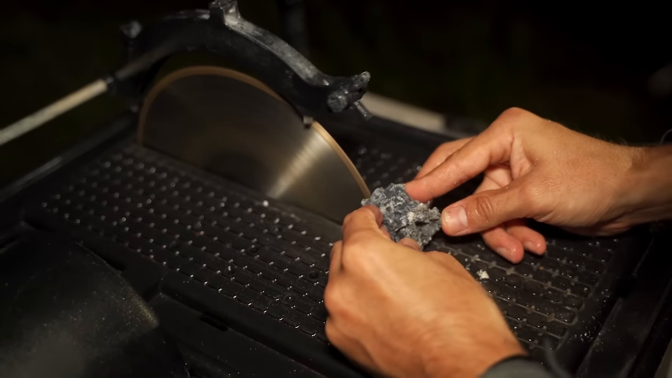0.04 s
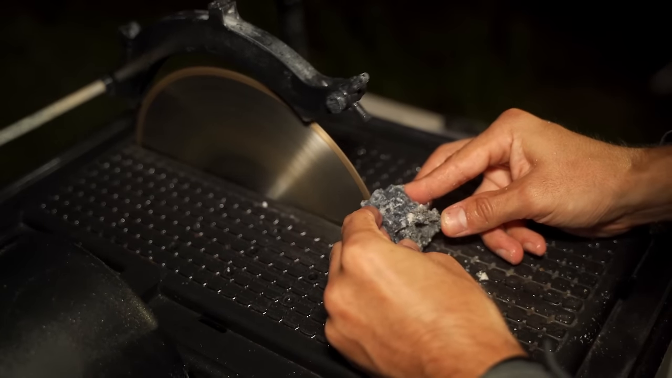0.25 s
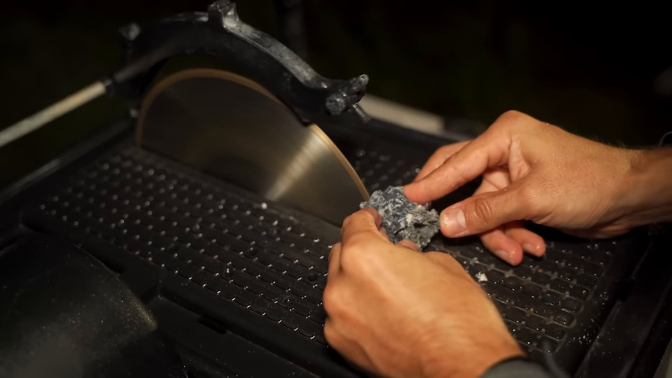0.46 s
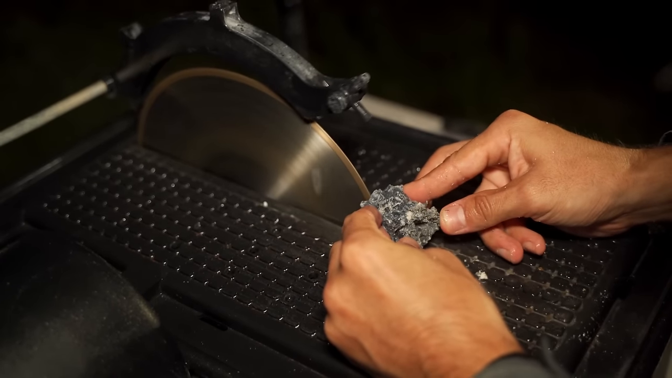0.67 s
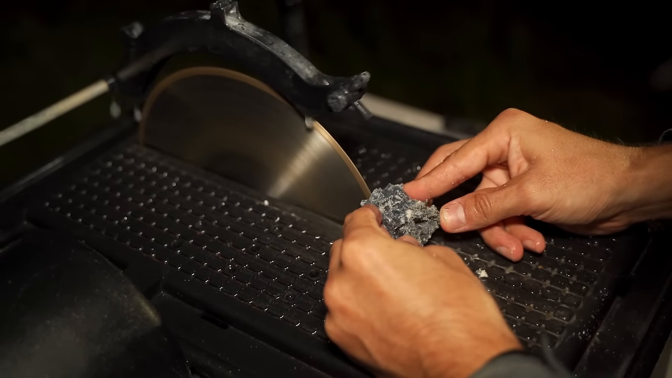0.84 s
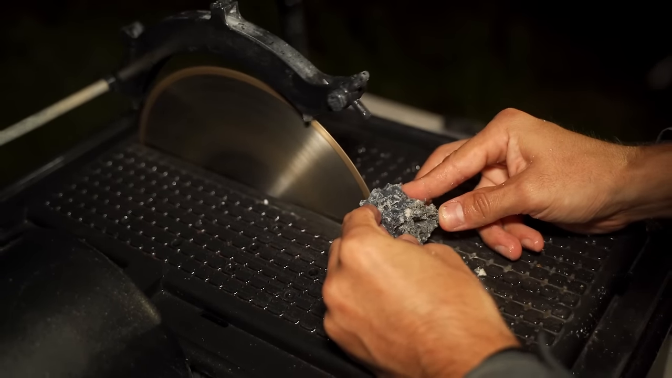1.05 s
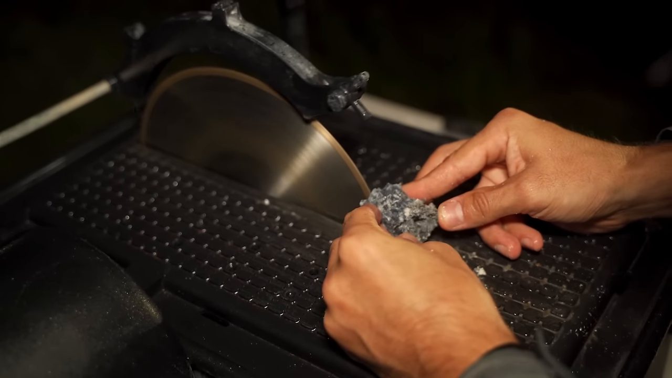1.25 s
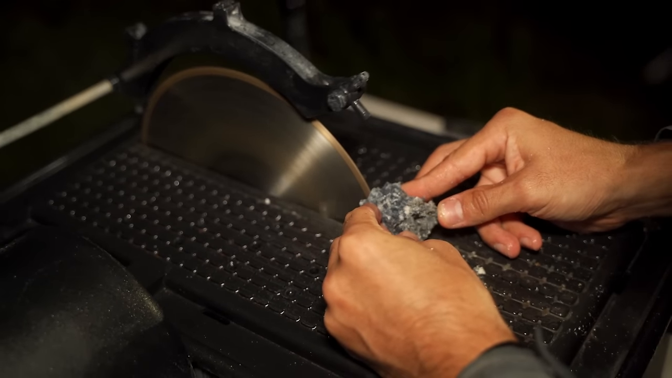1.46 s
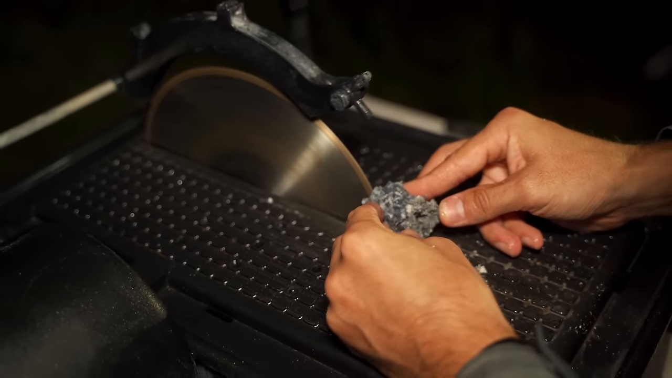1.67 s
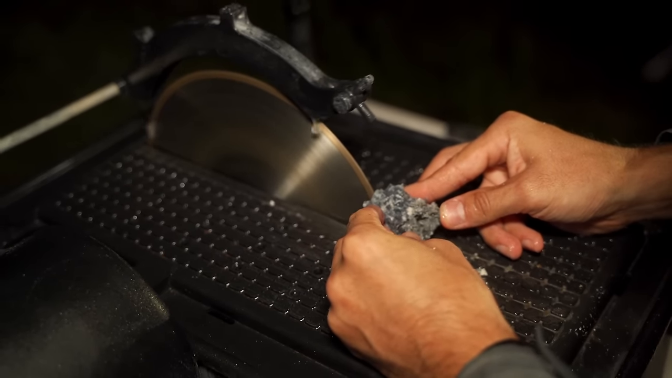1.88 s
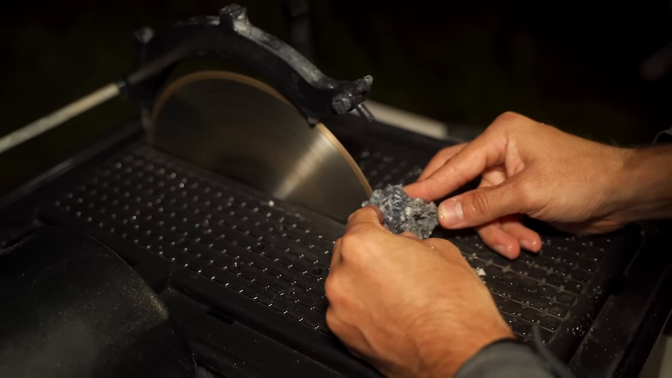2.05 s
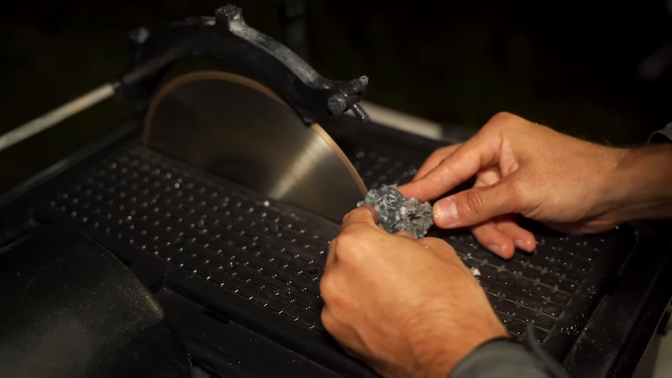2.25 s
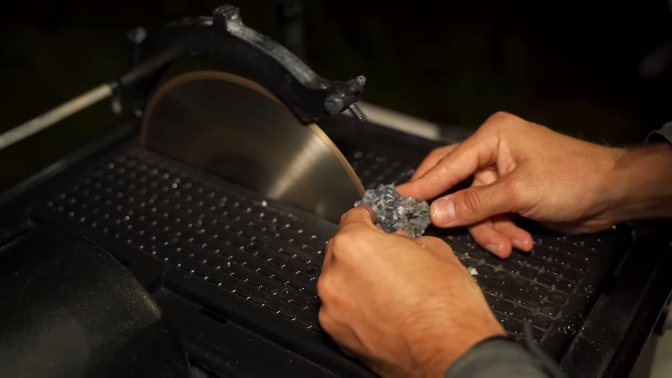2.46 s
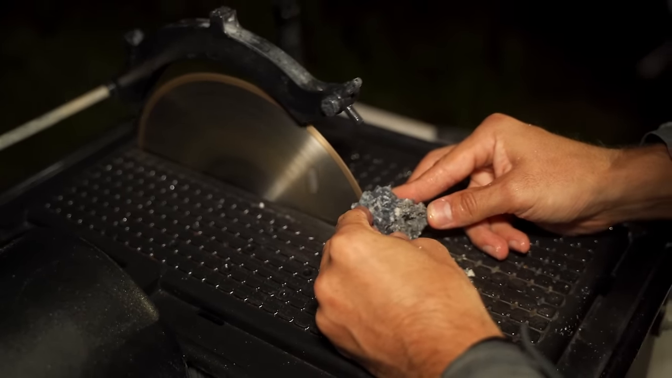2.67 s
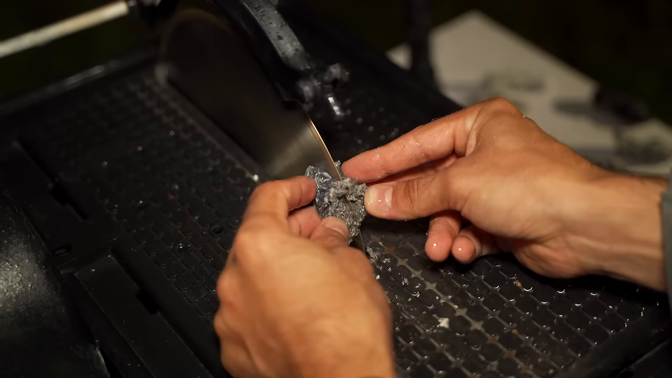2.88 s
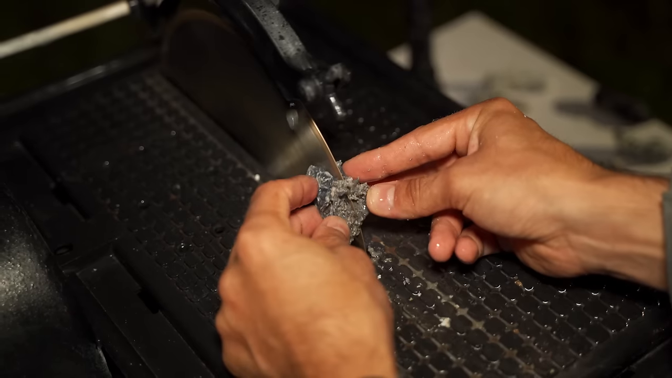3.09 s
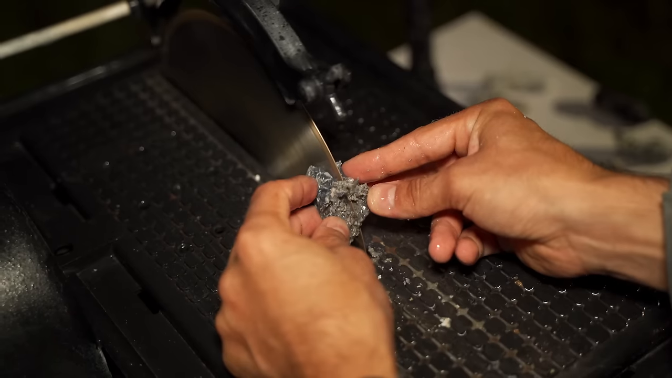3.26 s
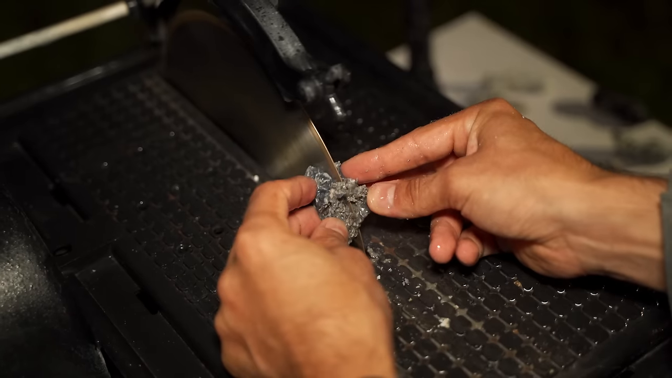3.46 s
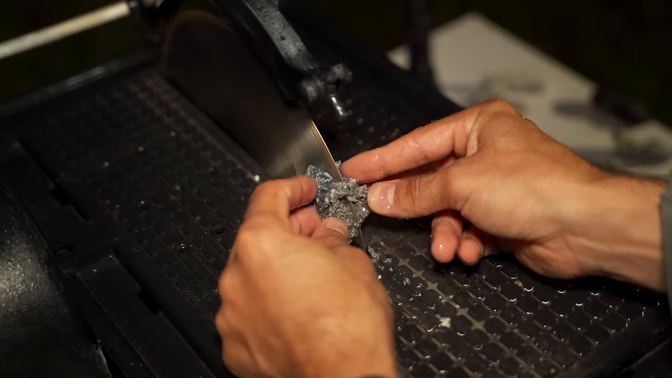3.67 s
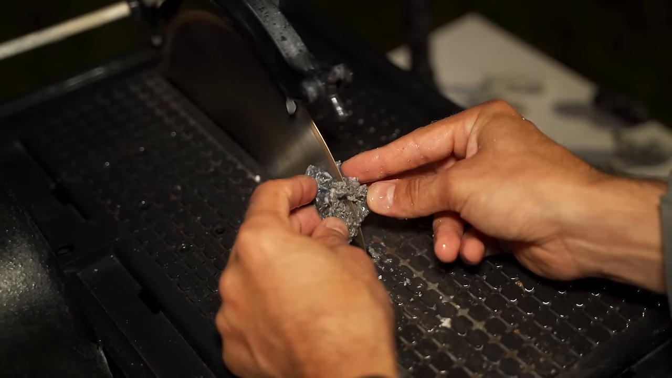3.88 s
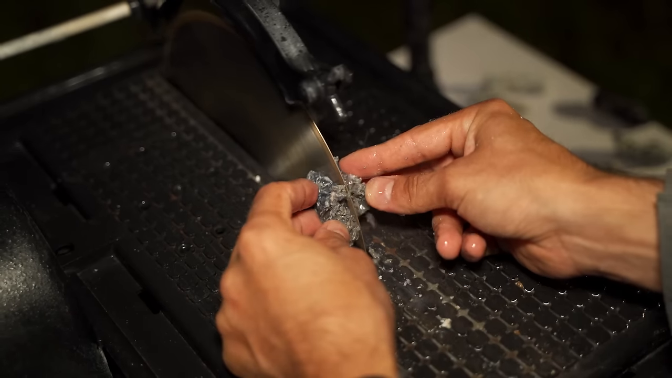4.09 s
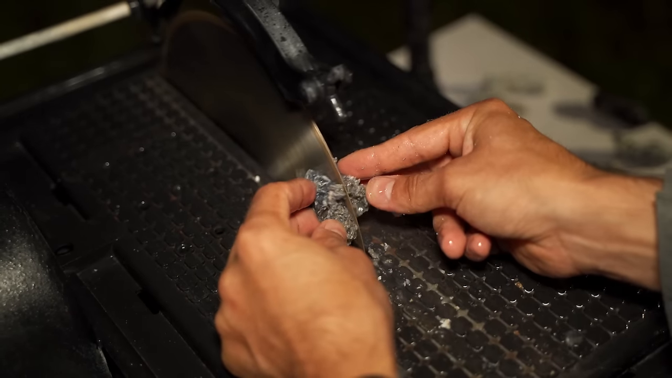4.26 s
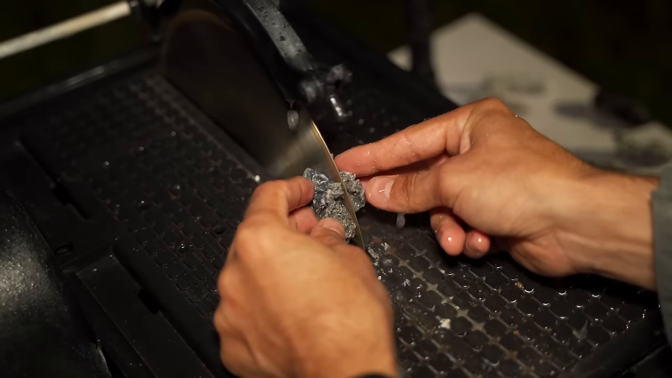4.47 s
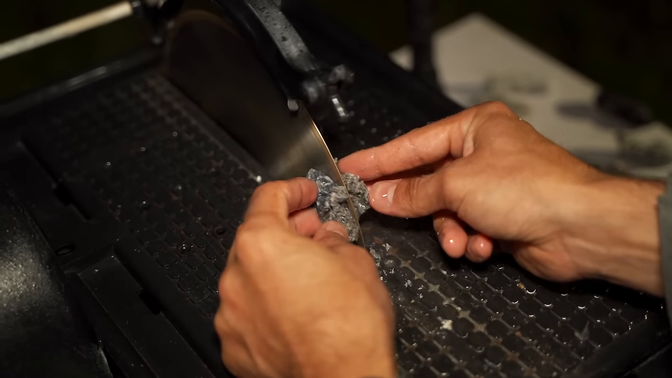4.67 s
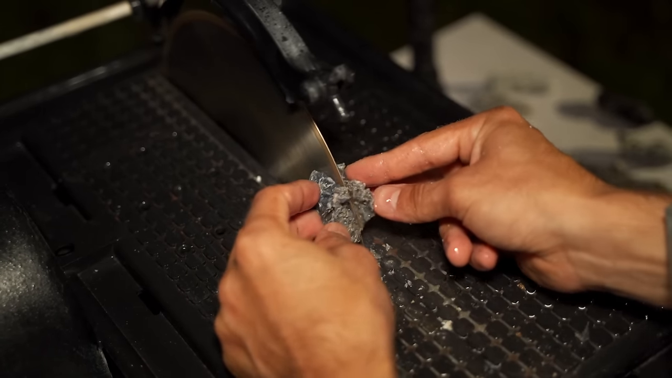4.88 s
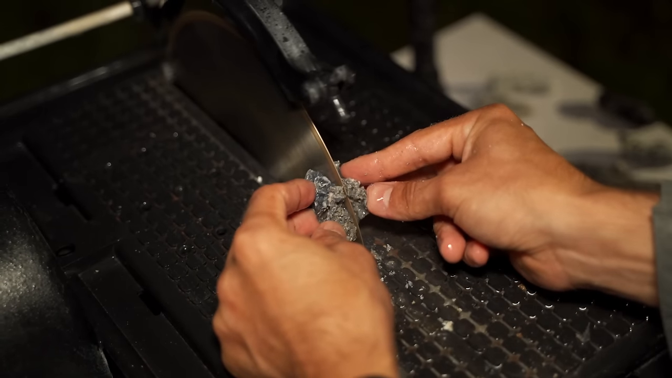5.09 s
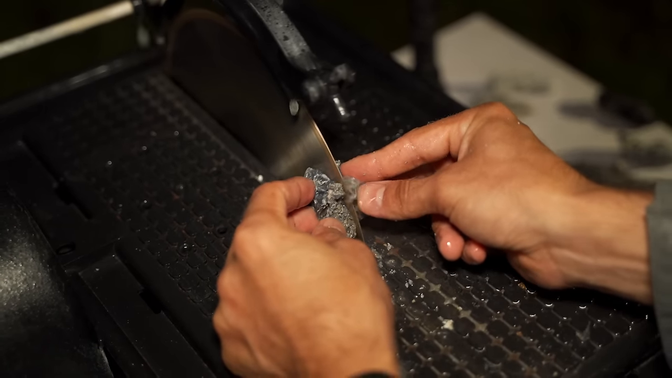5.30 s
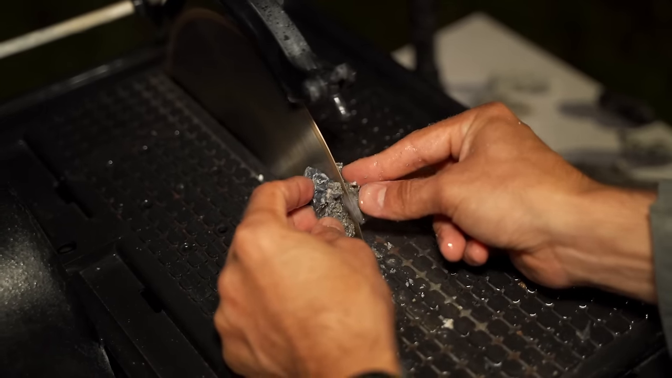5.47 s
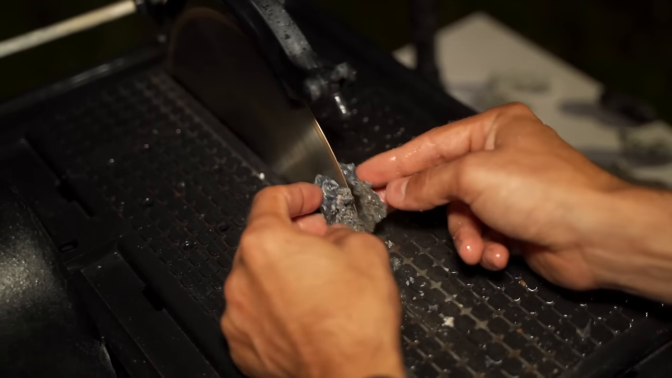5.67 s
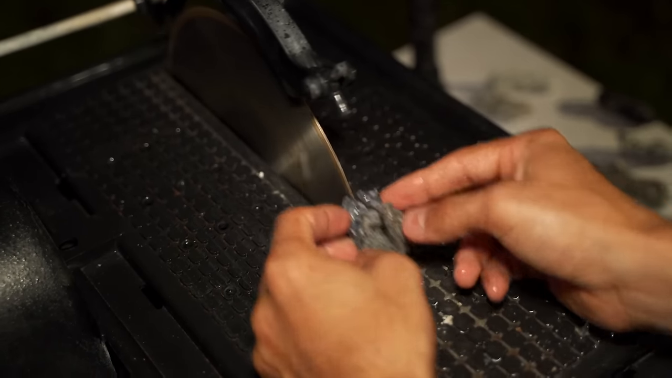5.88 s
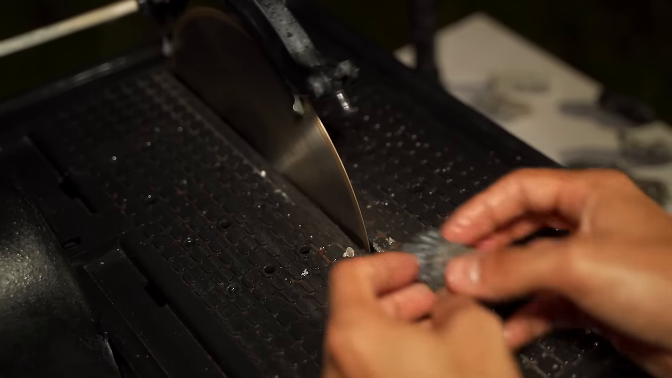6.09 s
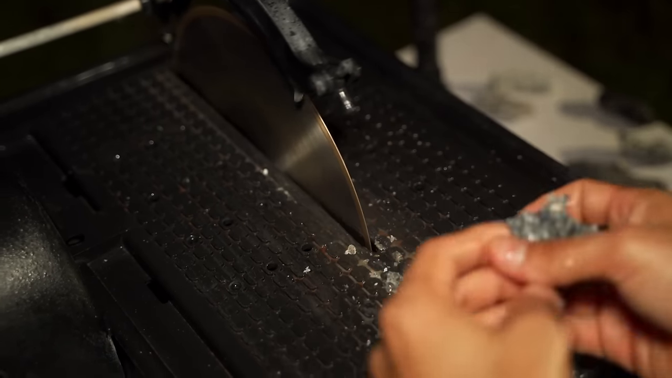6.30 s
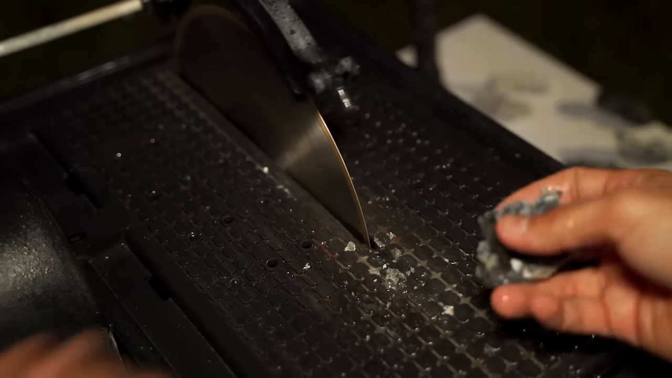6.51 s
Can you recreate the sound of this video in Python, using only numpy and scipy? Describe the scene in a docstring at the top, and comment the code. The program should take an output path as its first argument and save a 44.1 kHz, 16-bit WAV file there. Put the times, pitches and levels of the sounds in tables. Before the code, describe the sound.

Heard close and dry, a small wet saw hums with a fast throb and fine water spray. Stone against the blade gives a bright, squealing, singing scrape with growing rattle. At nearly three seconds it changes abruptly to a duller, hissing deep cut with buzzing judder and friction bursts. Near the end the stone comes free, the disc rings briefly, and motor and spray continue.

```python
"""A wet tile saw heard close by: a singing cut, then a hissing one, then the blade rings out over motor and spray.
In the shallow cut diamond grit makes the steel disc sing; a deep slot damps it and the grinding hisses.
The stone squeals, rasps, rattles and judders; once it leaves the rim the disc's modes decay freely.
Motor hum is a sum of shaft orders and spray is shaped noise; the sound is mono on both channels."""
import sys
import numpy as np
from scipy.fft import rfft, irfft, next_fast_len
from scipy.io import wavfile
from scipy.ndimage import map_coordinates

SR = 44100
rng = np.random.default_rng(int(sys.argv[2]) if len(sys.argv) > 2 else 0)


def int16_out(signal):
    """Quantize to a 16-bit WAV file."""
    q = np.round(np.clip(np.atleast_2d(signal).T, -1, 1) * 32767)
    wavfile.write(sys.argv[1], SR, q.astype(np.int16))


N = 288458
SHAFT_HZ = 29.72  # mean shaft speed
RELEASE_S = 5.87  # the stone leaves the rim


def amp(db):
    """Decibels to gain."""
    return 10 ** (np.asarray(db) / 20)


def unit(x):
    """Scale to rms 1."""
    return x / np.sqrt(np.mean(x ** 2) + 1e-20)


def along(points, hz):
    """Interpolate (frequency [Hz], value) points on a log frequency axis."""
    f, v = np.transpose(points)
    return np.interp(np.log(hz + 1), np.log(f + 1), v)


def curves(rows):
    """Interpolate each column after the time [s] to one value per sample."""
    s, *cols = np.transpose(rows)
    return [np.interp(np.arange(N) / SR, s, c) for c in cols]


def wobble(knots_per_s):
    """Smooth random curve through normally distributed knots."""
    knots = rng.standard_normal(int(N * knots_per_s / SR) + 4)
    return map_coordinates(knots, [np.arange(N) * knots_per_s / SR])


def filtered(x, response):
    """Multiply the spectrum of x by a gain that is a function of frequency [Hz]."""
    m = next_fast_len(N + SR // 4)
    spectrum = rfft(x, m) * response(np.fft.rfftfreq(m, 1 / SR))
    return irfft(spectrum, m)[:N]


def peak(hz, centre_hz, width_hz):
    """Resonance gain, 1 at the centre; width between the half-gain points."""
    return 1 / (1 + (2 * (hz - centre_hz) / width_hz) ** 2)


def gate(start_s, length_s, rise_s, fall_s):
    """Linear attack, hold and release, 0-1; each ramp takes at most half the length."""
    since_s = np.arange(N) / SR - start_s
    rise = since_s / min(rise_s, length_s / 2)
    fall = (length_s - since_s) / min(fall_s, length_s / 2)
    return np.clip(np.minimum(rise, fall), 0, 1)


def contact(db_per_s):
    """Full gain until the stone leaves the rim, then exponential decay."""
    return amp(-db_per_s * np.maximum(np.arange(N) / SR - RELEASE_S, 0))


def binding():
    """Gain left to throb and rattle while the stone is wedged in the slot, which steadies it."""
    # wedged spells: (start [s], length [s])
    binds = [(3.984, 0.76), (4.964, .3)]
    ramp_s, loss_db = 0.033, 6
    return amp(-loss_db * sum(gate(s, length, ramp_s, ramp_s) for s, length in binds))


def jolting():
    """Envelope of the stone's jumps in the hands: quick rise, exponential decay."""
    # jumps: (time [s], level [dB])
    jolts = [(4.715, -33), (4.92, -38), (5.26, -31.5), (5.37, -35)]
    rise_s, t60_s = .008, 0.27
    out = np.zeros(N)
    for s, db in jolts:
        since_s = np.arange(N) / SR - s
        out += np.clip(since_s / rise_s, 0, 1) * amp(db - 60 * np.maximum(since_s, 0) / t60_s)
    return out


def each_turn(turns, count):
    """Random pattern of count knots round the rim, repeated every turn."""
    pattern = rng.standard_normal(count)
    return unit(np.interp(turns % 1, np.arange(count) / count, pattern, period=1))


def grit_force(turns, repeat, rim_db, bite_db):
    """Diamonds strike the stone: a share of the power repeats every turn, harder where the rim stands proud."""
    same = np.sqrt(repeat) * each_turn(turns, count=1480)
    fresh = np.sqrt(1 - repeat) * rng.standard_normal(N)
    pressure_db = rim_db * each_turn(turns, count=40) + bite_db * wobble(70)
    return unit((same + fresh) * amp(pressure_db))


def body_gain(hz, column):
    """Grit spectrum plus damped resonances, finely rippled; column 0 is the shallow cut, 1 the deep."""
    # breaking grit: (frequency [Hz], shallow level [dB], deep level [dB])
    grit = [(120, -44, -50), (396, -26.5, -26.5), (690, -15, -66), (1050, -14.5, -52), (1750, -15.5, -24.5),
            (2700, -13.5, -14), (5070, -21, -10.5), (6020, -14, -13.5), (8450, -44, -7.5),
            (9260, -22.5, -16.5), (10700, -13.5, -11), (11900, -18, -14.5), (14300, -14.5, -11.5)]
    # blade, guard and tray resonances: (frequency [Hz], width [Hz], shallow level [dB], deep level [dB])
    body = [(782, 320, -24, -18), (1353, 91, -9, -10), (1445, 354, -12, -13), (1883, 58, -8, -20),
            (2302, 686, -12, -18), (2612, 586, -23, -15), (2874, 97, -11, -23), (3234, 43, -6, -9),
            (3517, 123, -9, -7.5), (3696, 110, -7, -17), (4109, 215, -11, -14), (4447, 121, -13, -6),
            (4917, 344, -5, -13), (5005, 244, -17, -9), (5436, 457, -10, -14), (5651, 110, -13, -14),
            (6439, 104, -6, -10), (6618, 114, -7, -23), (6860, 105, -9, -9), (7193, 428, -12, -12),
            (7758, 233, -3, -9), (8277, 277, -7, -14), (8620, 477, -11, -10), (9795, 47, -14, -7),
            (10131, 119, -14, -8), (10559, 52, -10, -8), (10914, 95, -25, -10), (13793, 67, -5, -5),
            (14534, 64, -8, -13), (15435, 97, -10, -14)]
    power = amp(along([(row[0], row[1 + column]) for row in grit], hz)) ** 2
    for centre_hz, width_hz, *levels_db in body:
        power = power + (amp(levels_db[column]) * peak(hz, centre_hz, width_hz)) ** 2
    knots = hz / 55  # one ripple knot per 55 Hz
    ripple = map_coordinates(rng.standard_normal(int(knots[-1]) + 4), [knots])
    return np.sqrt(power) * amp((2.5, 1.4)[column] * ripple)


def grinding(turns, depth):
    """Grit force heard through the saw body as crunch, scrape and hiss bands, crossfaded by depth of cut."""
    # push into the rim, before band offsets: (time [s], level [dB])
    force_points = [(0, -23.5), (.65, -22.5), (1.7, -22.5), (2.8, -23), (2.9, -21.5), (3.8, -20),
                    (4.1, -21.6), (4.7, -21.5), (4.74, -26.5), (4.78, -21.5), (4.87, -24), (4.96, -20.5),
                    (5.22, -20.3), (5.28, -24), (5.45, -23), (5.57, -21), (5.64, -22), (5.85, -22.5)]
    # low crunch: (time [s], level [dB])
    crunch_points = [(0.1, -38), (1.15, -32), (2.83, -30), (2.86, -37.5), (5.15, -37.5), (5.45, -34),
                     (5.9, -36.5)]
    # decay after release: crunch, scrape, hiss [dB/s]
    release_db_per_s = [27, 133, 322]
    hiss_db, scrape_db, slot_damps_db = 0.9, -0.5, 4.5  # a deep slot muffles the scrape
    force = grit_force(turns, repeat=0.32, rim_db=0.66, bite_db=0.8)
    shallow = unit(filtered(force, lambda hz: body_gain(hz, column=0)))
    deep = unit(filtered(force, lambda hz: body_gain(hz, column=1)))
    force_db = curves(force_points)[0]
    scrape_level_db = force_db + scrape_db - slot_damps_db * depth
    levels_db = [curves(crunch_points)[0], scrape_level_db, force_db + hiss_db]
    edges_hz, swings_db = [0, 2000, 6500, SR], [.7, .3, .6]
    out = np.zeros(N)
    for lo, hi, level_db, swing_db, fall in zip(edges_hz, edges_hz[1:], levels_db, swings_db, release_db_per_s):
        band = lambda x: unit(filtered(x, lambda hz: (hz >= lo) & (hz < hi)))
        gain = amp(level_db + swing_db * wobble(40)) * contact(fall)
        out += gain * ((1 - depth) * band(shallow) + depth * band(deep))
    return out


def blade(turns, depth, ring_db, flutter):
    """Grit drives the disc's modes with fluttering strength and phase; the last scrape leaves them to ring out."""
    # disc modes, shallow and deep before ring_db:
    # (frequency [Hz], shallow level [dB], deep level [dB], slip-off level [dB], t60 [s])
    modes = [(566, -58, -65, -60, .2), (657, -55, -62, -60, .2), (684, -55, -64, -60, .2),
             (770, -58, -57, -52, .2), (980, -55, -63, -58, .2), (1130, -56, -64, -60, .2),
             (1281, -54, -60, -56, .3), (1308, -58, -52, -52, .4), (802, -48, -58, -48, .2),
             (1458, -42, -48, -41, .9), (1556, -56, -56, -37, .9), (2293, -39.5, -50, -54, .3),
             (2353, -38, -48, -48, .3), (2638, -44, -59, -40, 1.0), (3068, -42, -51, -36.5, 1.35),
             (3112, -52, -58, -40, .8), (3284, -56, -56, -43, .6), (3510, -45, -52, -46, .5),
             (3531, -52, -51.5, -34.5, .9), (3712, -46, -49, -38, .7), (3881, -56, -56, -40.5, .9),
             (3994, -44, -54, -55, .3), (4527, -42, -50.5, -42, .36), (5064, -43, -47.5, -39, .9),
             (5359, -40, -56, -46, .6), (5507, -42, -52, -50, .4), (5565, -41, -46, -40, .55),
             (5954, -46, -57, -50, .6), (6220, -45, -48, -35.5, .62), (6584, -44, -52, -53, .3),
             (7461, -43, -50, -47, .5), (7582, -44, -46, -37, .34), (7800, -40, -50, -35, .3),
             (7913, -54, -56, -39, .35), (8110, -44, -51, -48, .4), (8290, -46, -48, -44, .38),
             (8788, -50, -45, -52, .2), (9028, -50, -55, -55, .2), (9577, -51, -56, -56, .2),
             (10205, -42, -48, -43, .22), (10864, -47, -55, -55, .15), (12215, -49, -51, -44, .15),
             (12505, -49, -55, -55, .12), (13805, -45, -50, -50, .12), (14169, -42, -54, -58, .12),
             (14610, -45, -53, -56, .12)]
    t, out = np.arange(N) / SR, np.zeros(N)
    since_s = t - RELEASE_S
    struck = np.clip(1 + since_s / 0.059, 0, 1)  # builds over the last 59 ms of contact
    touching = contact(db_per_s=108)
    driven_rms = np.sqrt(.5 + flutter ** 2 * 2 / 3)
    for hz, shallow_db, deep_db, free_db, t60_s in modes:
        # a fresh random knot each turn
        knots = rng.standard_normal((2, int(turns[-1]) + 2))
        cosine, sine = (flutter * np.interp(turns, np.arange(len(k)), k) for k in knots)
        level_db = ring_db + shallow_db + depth * (deep_db - shallow_db)
        driven = touching * amp(level_db) / driven_rms
        # each ringing mode wavers in level, 8 to 20 times a second
        waver = 1 + .3 * np.sin(2 * np.pi * rng.uniform(8, 20) * t)
        decay = amp(free_db - 60 * np.maximum(since_s, 0) / t60_s)
        free = np.sqrt(2) * struck * waver * decay
        phase = 2 * np.pi * (hz * t + rng.random())
        out += (driven * (1 + cosine) + free) * np.cos(phase) + driven * sine * np.sin(phase)
    return out


def squeal(trim_db, waver_rad):
    """Friction locks on to one mode of the disc in short spells: a sine with wavering phase and level."""
    # spells, before trim_db: (start [s], length [s], level [dB])
    squeals = [(0.0, .33, -28.5), (0.377, 0.53, -33), (0.975, 0.7, -33), (1.93, .17, -35), (2.36, .14, -33),
               (2.68, 0.17, -35), (4.0, .52, -44)]
    mode_hz, fade_s = 4527, 0.061
    phase = 2 * np.pi * mode_hz * np.arange(N) / SR + waver_rad * wobble(28.8)
    grip_db = 2 * wobble(18)
    spells = sum(amp(db) * gate(s, length, fade_s, fade_s) for s, length, db in squeals)
    return spells * amp(trim_db + grip_db) * np.sqrt(2) * np.sin(phase)


def rasps():
    """Friction bursts, each narrow noise round one resonance; some start off pitch and slide to it."""
    # stone rubs, binds, slides out, and ticks as it is lifted:
    # (start [s], length [s], frequency [Hz], width [Hz], upward slide [Hz], level [dB])
    bursts = [(0.625, 0.45, 566, 16, -6, -47), (2.2, 0.71, 973, 20, 1.5, -42),
              (3.703, 0.33, 5050, 240, 1, -35), (3.996, 0.1, 4550, 600, 2200, -26.5),
              (3.998, 0.76, 3770, 180, 0, -35), (4.0, 0.74, 4360, 390, -3, -32),
              (4.007, 0.71, 8830, 450, 0, -30.5), (4.01, 0.73, 10430, 690, -2, -28),
              (4.82, 0.42, 5060, 220, -0.5, -34.5), (5.314, 0.75, 1417, 220, 0, -41.5),
              (5.509, 0.13, 2800, 790, -0.5, -31.5), (5.655, 0.069, 4520, 1000, 900, -27),
              (5.978, 0.11, 2030, 780, 0, -41), (6.227, 0.024, 2830, 400, 1, -38),
              (6.305, .04, 3500, 1800, -1, -43)]
    rise_s, fade_s, slide_s = .02, 0.032, .022
    t, out = np.arange(N) / SR, np.zeros(N)
    for s, length, centre_hz, width_hz, slide_hz, db in bursts:
        pitch_hz = centre_hz - slide_hz * np.exp(-np.maximum(t - s, 0) / slide_s)
        phase = 2 * np.pi * np.cumsum(pitch_hz) / SR
        # two slow noises modulate the carrier in quadrature
        a, b = (filtered(noise, lambda hz: peak(hz, 0, width_hz)) for noise in rng.standard_normal((2, N)))
        noise_band = unit(a * np.cos(phase) + b * np.sin(phase))
        out += amp(db) * gate(s, length, rise_s, fade_s) * noise_band
    return out


def rattle(turns, trim_db, shake, uneven_db):
    """The stone rattles on the tray: shaped noise, harder once per turn and at every jolt."""
    # rattle, before trim_db: (time [s], level [dB])
    rattle_points = [(0, -50), (.65, -54), (1.2, -40), (1.9, -35), (2.76, -31.5), (2.95, -37.5), (4.0, -43),
                     (5.9, -59.5)]
    # tray spectrum, relative: (frequency [Hz], level [dB per Hz])
    tray = [(25, -36), (80, -23), (120, -7.5), (170, -2.5), (220, 4), (340, -3.5), (450, -9), (580, -12.5),
            (750, -10), (1000, -14), (1500, -41)]
    knocks = rng.standard_normal(N) * (1 + shake * np.sin(2 * np.pi * turns))
    level_db = curves(rattle_points)[0] + trim_db + uneven_db * wobble(12)
    level = amp(level_db) * binding() + jolting()
    return level * unit(filtered(knocks, lambda hz: amp(along(tray, hz))))


def judder(turns, level_db, jolt_db, width_hz):
    """The held stone resonates with shaft orders near its own pitch, in one long spell and at jolts."""
    # stone pitch: (time [s], frequency [Hz])
    pitch_points = [(2.6, 250), (2.72, 266), (3.032, 247.4), (3.73, 259.9), (4.05, 246.7)]
    pitch_hz = curves(pitch_points)[0]
    tone = np.zeros(N)
    for k in range(8, 11):
        phase = 2 * np.pi * k * turns + .2 * wobble(5.8)
        tone += peak(k * SHAFT_HZ, pitch_hz, width_hz) * np.sin(phase)
    spell = gate(start_s=2.45, length_s=1.59, rise_s=0.47, fall_s=0.056)
    return (amp(level_db) * spell + amp(jolt_db) * jolting()) * unit(tone)


def motor(turns, depth, rough, trim_db, sway_db):
    """Shaft orders throb once per turn, less steadily in the shallow cut; the hum shifts between two balances."""
    # throb, before trim_db: (time [s], level [dB])
    throb_points = [(0, -31), (.8, -34), (1.4, -31), (2.55, -36), (2.8, -38.5), (3.4, -40), (3.7, -35.5),
                    (4.9, -33.5), (5.45, -32), (5.8, -34.5), (6.0, -31.5), (6.54, -28.5)]
    # share of the second hum balance: (time [s], share [0-1])
    share_points = [(0, 0.04), (3.4, 0), (3.8, 0.82), (5.3, 0.1), (5.9, 0.53)]
    # first hum balance, relative: (shaft order [-], level [dB])
    first_orders = [(1, -40), (2, -26), (3, -28), (4, -19), (5, -12), (6, -3.5), (7, -0.5), (8, -10),
                    (9, -14.5), (10, -18), (11, -11), (12, -16), (13, -26)]
    # second hum balance, relative: (shaft order [-], level [dB])
    second_orders = [(1, -35), (2, -11.5), (3, -18), (4, -4), (5, 3), (6, -2.5), (7, -6.5), (8, 3),
                     (9, -15), (10, -1), (11, -15), (12, -20), (13, -7.5), (15, -8), (17, -14)]

    def hum(orders):
        """The housing delays lower orders: quadratic phase [rad] spreads each knock over the turn."""
        return unit(sum(amp(db) * np.cos(2 * np.pi * k * turns + .58 * k * k) for k, db in orders))

    share = curves(share_points)[0]
    tone = (1 - share) * hum(first_orders) + share * hum(second_orders)
    level_db = curves(throb_points)[0] + trim_db + sway_db * (1 - depth) * wobble(14)
    return amp(level_db) * binding() * tone * (1 + rough * wobble(90))


def spray(turns, level_db, spatter_db):
    """Water and air flung off the disc: shaped noise with fast spatter and a slight swell each turn."""
    # spray spectrum, relative: (frequency [Hz], level [dB per Hz])
    spectrum = [(200, -12), (490, 0), (620, -5.5), (780, 3.5), (1000, -6), (1320, -2), (1520, -8.5),
                (1700, -11), (2050, -6.5), (3000, -8), (5000, -9), (8500, -11.5), (9300, -14.5),
                (15500, -15.5)]
    swell_db = 0.5 * np.sin(2 * np.pi * turns)
    drops = rng.standard_normal(N) * amp(spatter_db * wobble(360) + swell_db)
    shaped = unit(filtered(drops, lambda hz: amp(along(spectrum, hz))))
    return amp(level_db + 0.91 * wobble(13)) * shaped


def scene():
    """One slightly unsteady shaft times the whole saw; both channels carry the same sum."""
    # depth of blade in stone (time [s], share [0-1]); the scene jumps ahead at 2.85 s
    depth_points = [(0, 0.02), (2.835, 0.14), (2.855, 1), (5.9, 0.99)]
    turns = np.cumsum(SHAFT_HZ * (1 + .0015 * wobble(4))) / SR
    depth = curves(depth_points)[0]
    steel = blade(turns, depth, ring_db=4.0, flutter=1.8) + squeal(trim_db=0.5, waver_rad=0.7)
    cut = grinding(turns, depth) + steel + rasps()
    stone = rattle(turns, trim_db=3.0, shake=0.18, uneven_db=2.0)
    stone = stone + judder(turns, level_db=-33.5, jolt_db=-8, width_hz=19)
    machine = motor(turns, depth, rough=0.24, trim_db=-2.1, sway_db=2.0)
    machine = machine + spray(turns, level_db=-39.5, spatter_db=1.0)
    mono = cut + stone + machine
    return np.array([mono, mono])


def record(dry):
    """The recorder keeps nothing at or above its band limit."""
    top_hz = 15750
    return np.array([filtered(channel, lambda hz: hz < top_hz) for channel in dry])


dry = scene()
out = record(dry)
int16_out(out)
```